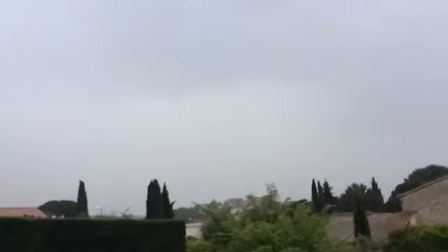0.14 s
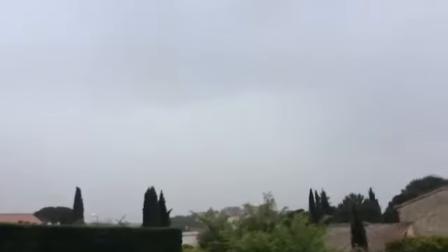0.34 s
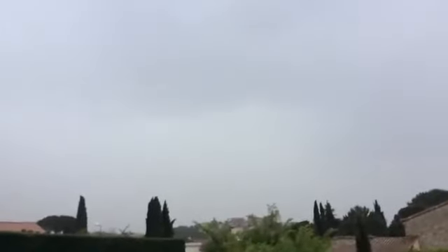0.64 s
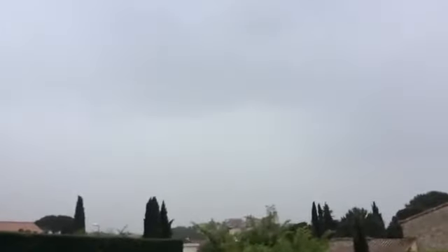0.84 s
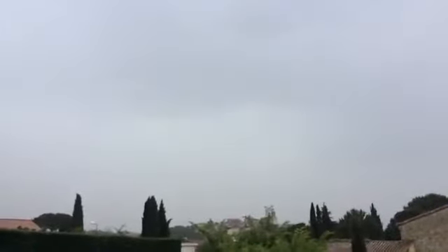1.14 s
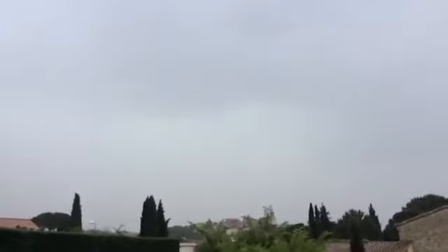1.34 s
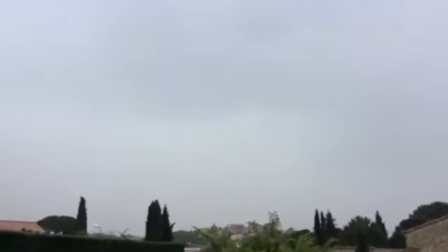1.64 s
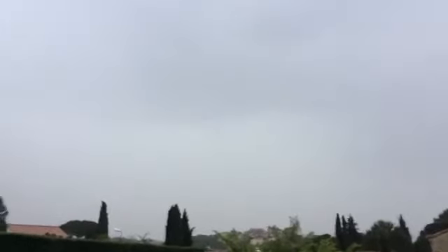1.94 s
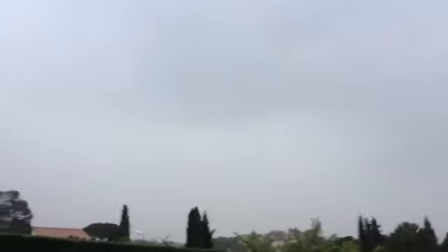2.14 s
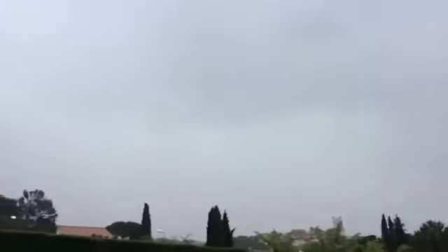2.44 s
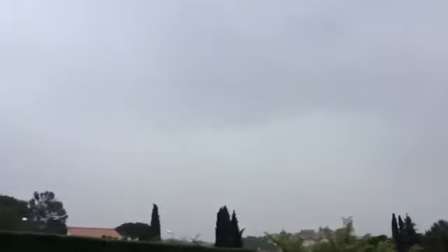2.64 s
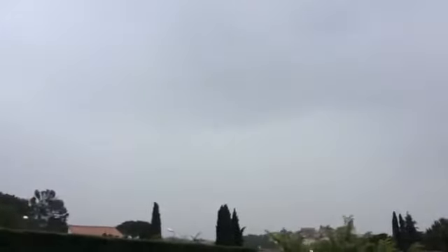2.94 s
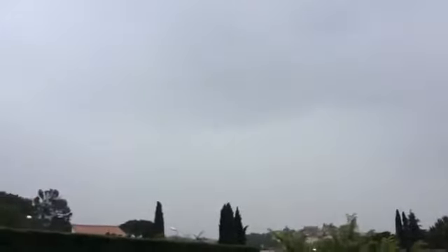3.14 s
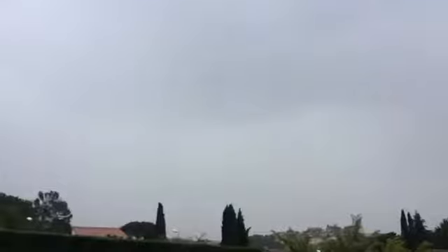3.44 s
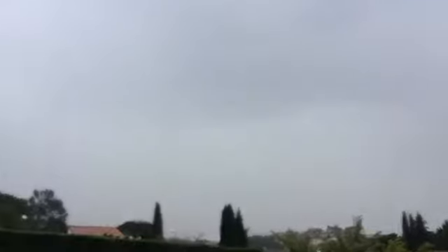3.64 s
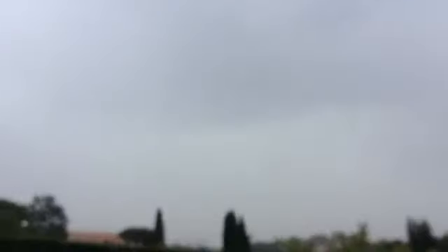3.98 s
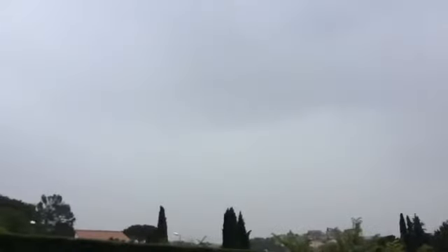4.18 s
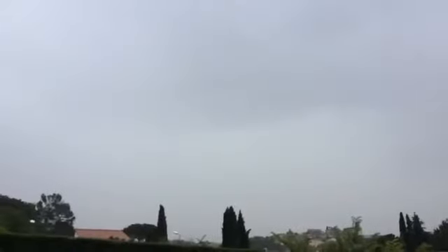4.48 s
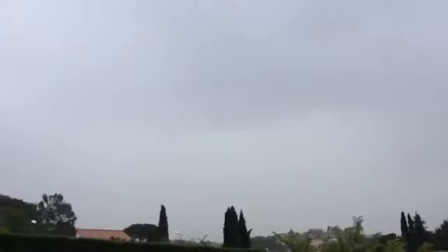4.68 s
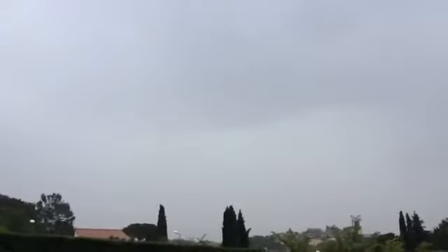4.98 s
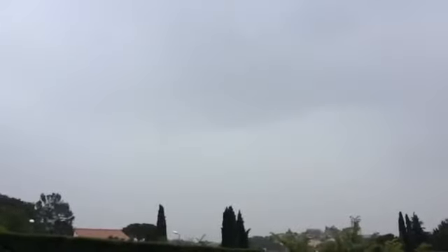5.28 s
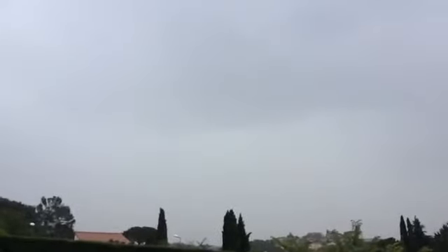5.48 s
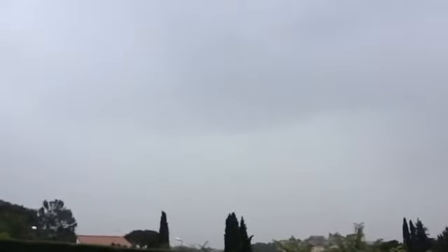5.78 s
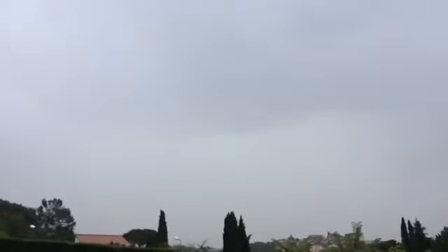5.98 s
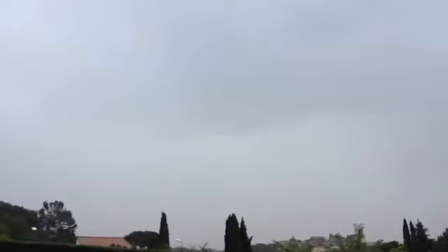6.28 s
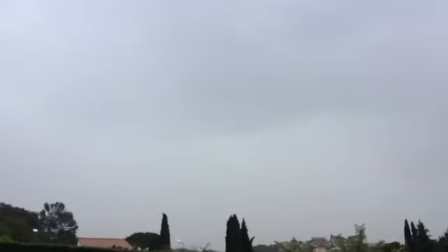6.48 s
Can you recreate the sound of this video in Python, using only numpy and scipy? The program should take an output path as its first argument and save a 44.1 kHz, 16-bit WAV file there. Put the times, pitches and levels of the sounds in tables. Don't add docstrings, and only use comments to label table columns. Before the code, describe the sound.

Distant low thunder rolls and bumps, then fades into weak rumbles beneath steady rain pattering and ticking on garden leaves and roof tiles.

```python
import sys
import numpy as np
from scipy import signal
from scipy.fft import rfft, irfft
from scipy.io import wavfile
from scipy.ndimage import uniform_filter1d

SR = 44100
rng = np.random.default_rng(int(sys.argv[2]) if len(sys.argv) > 2 else 0)


def put_to_file(sound):
    columns = np.atleast_2d(sound).T
    safe = np.clip(columns, -1, 1)
    whole_steps = np.round(safe * 32767)
    wavfile.write(sys.argv[1], SR, whole_steps.astype(np.int16))


def attenuation_scalar(level_db):
    decades = np.asarray(level_db, float) / 20
    return 10 ** decades


N = 291942

# time in seconds, strength in dB.
ROLL_STRENGTH = [(0.0, -50), (0.33, -51.5), (0.87, -44.5), (0.93, -49), (1.07, -53.5), (1.31, -47.5),
                 (1.68, -54), (2.53, -53.5), (2.96, -52), (3.06, -49), (3.15, -50), (3.24, -55),
                 (3.57, -59), (3.59, -47), (3.65, -56), (5.97, -56.5), (6.16, -51.5), (6.25, -57),
                 (6.62, -57.5)]
MIDDLE_DB = -53
# lowest pitch in Hz, highest pitch in Hz, cycles per wave, arrivals per second.
ROLL_PARTS = [
    (55, 118, 2.55, 180),
    (128.9, 179.8, 8.7, 250),
    (182, 244.4, 8.1, 350),
    (251.7, 483.5, 2.6, 800),
    (35.3, 58, 1.5, 67),
]
# level in dB at middle strength, share of the strength it follows.
ROLL_BEDS = [
    (-53.5, 0.28),
    (-51, .9),
    (-54, 1),
    (-52.5, 0.92),
    (-60, .1),
]
# time in seconds, peak in dB, length in seconds.
BOOMS = [(0.047, -39, 0.023), (0.167, -37, 0.023), (.33, -44, 0.09), (0.684, -38, 0.037),
         (.93, -44.5, 0.055), (1.09, -54, .03), (1.234, -52, .02), (1.48, -46, 0.049), (1.783, -49, 0.055),
         (2.1, -43, 0.092), (2.39, -44, 0.025), (2.67, -45, 0.046), (3.088, -39, 0.06), (3.3, -53, 0.11),
         (3.62, -44, 0.09), (3.797, -46, 0.035), (4.05, -45, 0.036), (4.363, -46, 0.033),
         (4.57, -57, 0.069), (4.995, -46, 0.058), (5.25, -57, 0.086), (5.5, -57, 0.087),
         (5.79, -47.5, 0.079), (5.962, -49, 0.078), (6.095, -42, 0.069), (6.196, -40, 0.037),
         (6.45, -46, 0.053)]
BOOM_HZ, BOOM_OCTAVES = 71, 0.33
# time in seconds, peak in dB, pitch in Hz, length in seconds.
SWELLS = [(.005, -33, 169, .03), (0.09, -37.5, 203, 0.029), (0.215, -43, 174, 0.086),
          (0.33, -47, 150, 0.052), (0.477, -46.5, 174, 0.1), (0.64, -39, 155, 0.028),
          (.76, -43.5, 201, .06), (0.838, -29.5, 168, 0.031), (1.123, -44.5, 150, 0.025),
          (1.233, -46, 150, 0.023), (1.328, -40, 183, 0.16), (1.478, -40, 173.5, 0.098),
          (1.735, -42.5, 176, 0.036), (1.85, -45.5, 148, 0.081), (2.07, -47, 198, .1),
          (2.295, -49.5, 152, .04), (2.41, -52, 150, 0.019), (2.524, -50, 151, 0.045),
          (2.72, -50, 195, 0.033), (2.927, -54, 180, 0.052), (3.045, -38, 162, 0.035),
          (3.18, -54, 187, 0.066), (3.61, -50, 183, 0.044), (3.797, -49.5, 169, 0.035),
          (4.04, -53, 170, .03), (4.27, -59, 193, 0.042), (5.894, -44.5, 151, 0.023),
          (6.158, -45.5, 175, .06), (6.288, -44.5, 178, 0.022), (6.442, -47.5, 150, .03)]
SWELL_OCTAVES = 0.22
# start in seconds, peak in dB, pitch in Hz.
CLAPS = [(0.008, -29.5, 157), (0.015, -35.5, 217), (0.041, -32, 105), (0.042, -33.3, 145),
         (0.082, -35, 200), (0.099, -28, 217), (0.118, -31, 171), (0.151, -28.5, 105), (0.362, -33, 154),
         (0.414, -31.5, 145), (0.598, -33.7, 144), (0.643, -31.6, 170), (0.806, -28, 134),
         (0.807, -33.5, 185), (0.854, -31.5, 300), (0.871, -37, 157), (0.876, -33.0, 277),
         (1.222, -33.0, 158), (1.278, -32.3, 185), (1.281, -34, 255), (1.312, -35, 217),
         (1.332, -32.3, 157), (1.332, -33, 217), (1.364, -31.6, 185), (1.374, -34, 134),
         (1.405, -32.0, 217), (1.435, -33, 233), (1.453, -32, 105), (1.453, -30, 145), (1.456, -36, 200),
         (1.496, -41, 235), (1.496, -27.5, 170), (1.547, -33, 185), (1.748, -32.5, 168),
         (2.112, -32.5, 134), (2.717, -33, 217), (2.897, -34, 200), (2.992, -35.8, 157),
         (3.019, -32.5, 145), (3.039, -39, 200), (3.045, -36, 277), (3.052, -34, 145), (3.059, -36.5, 255),
         (3.066, -40, 105), (3.098, -33.5, 134), (3.137, -36.6, 104), (3.231, -33, 200),
         (4.033, -37.5, 135), (6.099, -35, 123), (6.146, -38, 134), (6.16, -37, 185), (6.193, -31.5, 105),
         (6.195, -41, 145)]
# start in seconds, peak in dB,
# pitch in Hz.
MORE_CLAPS = [(.154, -38, 71), (.283, -35, 80), (.642, -36, 71), (.651, -32.5, 100), (.695, -33.5, 100),
              (0.695, -38, 71), (.888, -36, 100), (.932, -34.5, 100), (1.233, -40, 100), (1.5, -37, 71),
              (1.727, -37, 100), (2.039, -35, 84), (2.086, -35, 75), (2.352, -37.5, 67), (2.384, -38, 95),
              (2.607, -42, 95), (2.644, -36, 100), (2.717, -40, 89), (3.015, -40, 64), (3.074, -38, 71),
              (3.097, -37, 100), (3.587, -38, 84), (3.631, -42, 80), (4.028, -37, 100), (4.317, -39, 60),
              (4.953, -37, 75), (6.037, -36, 71), (6.085, -37.5, 75), (6.18, -33, 67), (6.444, -38, 100),
              (.235, -35, 150), (.826, -33, 140), (.852, -30.5, 149), (3.594, -36.5, 200), (3.608, -39, 330),
              (3.2, -43, 330), (1.87, -38, 120), (1.97, -39, 120), (2.265, -39, 75), (2.56, -35, 160),
              (3.22, -40, 80), (3.52, -40, 115), (3.7, -41, 75), (4.15, -42, 165), (4.58, -40, 120),
              (4.65, -42, 150), (5.215, -42, 75), (5.785, -39, 110), (5.845, -39, 80), (5.89, -39, 110),
              (6.25, -42, 100)]
# start in seconds, peak in dB, pitch in Hz.
FRONTS = [
    (.7745, -24.5, 165),
    (.8392, -22, 170),
]
CLAP_DAMPING, FRONT_DAMPING = 0.2, 0.29
CLAP_DB, COVER_DB = -2.5, -10.5

# start in seconds, tick in dB, ring in Hz, splash in dB.
TILE_DROPS = [(.0547, -27.5, 3400, -56), (.0712, -31, 2380, -46), (.1101, -28, 3300, -51),
              (.3275, -30, 2900, -46), (.4299, -34, 3580, -56), (.566, -40, 2500, -53),
              (.9028, -36, 2310, -49), (.9774, -26.5, 3970, -52), (1.1004, -35, 4610, -51),
              (1.136, -26, 2370, -48), (1.266, -29.5, 3640, -55), (1.4374, -32, 4060, -55),
              (1.8632, -28, 2880, -45.5), (1.8801, -31, 1900, -48), (1.892, -28, 2200, -52),
              (2.286, -32, 3360, -51), (2.3534, -37, 2400, -54), (2.6024, -34, 4250, -50),
              (3.2375, -30, 2020, -48), (4.91, -42, 4000, -49), (5.1225, -29, 2770, -57),
              (5.1268, -28, 2500, -49), (5.157, -35, 3900, -47), (5.168, -36, 3000, -50),
              (5.3857, -36, 2910, -52), (5.8316, -34, 2540, -51), (6.479, -36, 2740, -49)]
# start in seconds, tick in dB, ring in Hz, splash in dB.
LEAF_SNAPS = [(.3064, -40, 5660, -48), (.6564, -29, 6080, -44), (.6624, -30, 6380, -51),
              (.706, -37, 5600, -43), (1.1375, -30, 5100, -54), (1.639, -37, 6500, -46),
              (1.7968, -35, 4860, -50), (1.8632, -32, 5570, -53), (2.0457, -33, 5590, -55),
              (2.0632, -38, 6310, -48), (2.2857, -42, 5170, -45), (3.2375, -33, 5990, -49),
              (3.5882, -33, 5130, -46), (3.984, -35, 5680, -46), (4.9254, -37, 6180, -50),
              (5.1225, -39, 6000, -56), (5.127, -34, 6200, -55), (6.0417, -38, 6870, -52),
              (6.1754, -36, 4910, -53), (6.2976, -38, 5320, -45), (6.3664, -36, 6000, -47)]
# start in seconds, tick in dB, ring in Hz, splash in dB.
PUDDLE_RINGS = [(1.5866, -33, 3660, -55), (1.6052, -33, 2900, -49), (1.607, -34, 4130, -52),
                (3.258, -32, 2930, -54), (3.29, -39, 2640, -45), (6.001, -42, 3500, -58),
                (6.006, -40, 2900, -50), (6.055, -40, 3100, -50), (6.0195, -35, 2950, -49),
                (6.0425, -32.5, 2900, -48), (6.043, -40, 4600, -56), (6.0625, -31, 2580, -46),
                (6.066, -40, 3800, -52), (6.0745, -40, 3360, -52), (5.131, -36, 2790, -51),
                (5.164, -37, 4000, -53), (6.083, -34, 2400, -48)]
# start in seconds, tick in dB, ring in Hz, splash in dB.
SILL_CRACKS = [(.2507, -29, 2200, -54), (.252, -30, 1700, -54), (.259, -29, 2100, -48),
               (.266, -33, 1890, -47), (.6850, -26, 7000, -41), (.6852, -24.5, 5300, -46.5),
               (.6855, -30.5, 3220, -54), (1.1365, -31, 6880, -59), (1.6374, -23.5, 2640, -47),
               (1.6388, -29.5, 3000, -50), (1.639, -31, 4400, -52), (1.6380, -28, 3500, -44),
               (1.65, -30, 2800, -45), (1.8, -36, 2370, -52), (3.3, -40, 1300, -52),
               (3.824, -34, 2260, -58), (4.438, -40, 1450, -54), (4.418, -37, 2600, -50),
               (4.66, -38, 3600, -50), (4.25, -39, 2000, -49)]
# start in seconds, tick in dB, ring in Hz, splash in dB.
EAVES_DRIPS = [(.065, -32, 2330, -48), (.091, -39, 1640, -49), (.2505, -33, 1460, -51),
               (.263, -30, 1300, -41), (.308, -35, 1300, -44.5), (.408, -41, 999, -50.5),
               (.566, -40, 1360, -49), (.628, -39, 800, -48), (.649, -35, 1810, -52), (.75, -42, 703, -44),
               (.767, -29, 2090, -44), (1.155, -30, 1300, -46), (1.333, -45, 950, -45.5),
               (1.476, -30, 1350, -49), (1.796, -37, 1390, -45), (1.88, -30, 1810, -44.5),
               (2.112, -36, 1900, -44), (2.353, -43, 1430, -43.5), (2.618, -33, 977, -41.5),
               (2.633, -36, 2030, -47), (2.648, -37, 1320, -49), (2.871, -35, 1120, -44),
               (3.207, -48, 1040, -46), (3.593, -37, 1790, -43), (3.967, -29.5, 1420, -51),
               (4.417, -43, 848, -44), (4.542, -34, 1160, -48), (4.927, -41, 1400, -43.5),
               (4.972, -28, 1130, -48), (5.871, -42, 1370, -49), (.385, -40, 750, -50),
               (.53, -36, 1400, -47), (.622, -37, 2700, -52), (1.195, -42, 750, -48),
               (1.362, -38, 750, -49), (1.66, -36, 1500, -51), (2.622, -35, 2600, -54),
               (2.653, -36, 2200, -55), (2.755, -38, 1800, -50), (2.908, -39, 1400, -50),
               (3.38, -35, 750, -58), (4.596, -38, 1100, -48), (5.727, -41, 2800, -47.5),
               (6.226, -34, 750, -50)]

# time in seconds, level in dB, brightness in dB of treble over the middle.
SHOWER = [
    (0.0, -48, 0.7),
    (0.66, -47.5, 0.6),
    (3.359, -48, 0.4),
    (4.35, -48.5, 1.05),
    (4.851, -49, 1),
    (6.62, -47.5, 0.83),
]
# pitch in Hz, level in dB per Hz.
WASH_COLOUR = [(24, -29), (40, -3), (70, 3.5), (155, 6.5), (314, -11.5), (419, -16), (523, -11.5),
               (1620, -14), (4400, -19.5), (6000, -20), (7320, -22), (8000, -22.5), (10400, -62),
               (17600, -120)]

# time in seconds, length in seconds.
TREBLE_DIPS = [
    (.03, .02),
    (.11, .02),
    (.41, .08),
    (.665, .03),
    (.855, .02),
    (1.5, .025),
]
# time in seconds, lowest pitch in Hz, highest pitch in Hz, level in dB.
SIDE_HISS = [(.125, 5160, 6300, -61), (.385, 5100, 6960, -61), (.5, 6200, 7600, -64),
             (.68, 3240, 7800, -62.5), (2.17, 4150, 5200, -63), (2.73, 5600, 7000, -63),
             (2.94, 4170, 5170, -68), (3.17, 4150, 5750, -62), (4.075, 4150, 5200, -64),
             (4.24, 5150, 6220, -62), (5.33, 5650, 6800, -63), (5.955, 5140, 6300, -63)]


def evened(x):
    return x / np.sqrt(np.mean(x ** 2) + 1e-20)


def read(points, hz):
    f, value = np.transpose(points)
    return np.interp(np.log(hz + 1), np.log(f + 1), value)


def add(mix, s, sound):
    part = mix[max(round(s * SR), 0):][:len(sound)]
    part += sound[:len(part)]


def band(x, lo_hz, hi_hz, order=2):
    sos = signal.butter(order, [lo_hz, min(hi_hz, SR / 2.2)], "band", fs=SR, output="sos")
    return signal.sosfilt(sos, x)


def damped_wave(t, hz, decay_per_s, peak_db):
    u = decay_per_s * t
    return attenuation_scalar(peak_db) * np.e * u * np.exp(-u) * np.sin(2 * np.pi * hz * t)


def grains(lo_hz, hi_hz, cycles, per_s, spread_db, count=16):
    arrives = rng.random(N) < per_s / SR
    size = attenuation_scalar(spread_db * np.minimum(rng.exponential(1, N), 3.2)) * arrives
    size *= rng.choice([-1., 1.], N)
    kind, out = rng.integers(0, count, N), np.zeros(N)
    for k, hz in enumerate(np.geomspace(lo_hz, hi_hz, count)):
        u = np.arange(0, 4 * cycles, hz / SR) / cycles
        wavelet = u * np.exp(-3 * u) * np.sin(2 * np.pi * cycles * u) * np.sqrt(hz)
        out += signal.oaconvolve(size * (kind == k), wavelet)[:N]
    return evened(out)


def roll_loudness(t, hz, bed_db, share):
    strength_db = np.interp(t, *np.transpose(ROLL_STRENGTH))
    power = attenuation_scalar(bed_db + share * (strength_db - MIDDLE_DB)) ** 2
    rises = [(*row, SWELL_OCTAVES) for row in SWELLS]
    rises += [(s, db, BOOM_HZ, length, BOOM_OCTAVES) for s, db, length in BOOMS]
    for s, peak_db, centre_hz, length, reach in rises:
        off_pitch = np.log2(hz / centre_hz) / reach
        power = power + attenuation_scalar(peak_db) ** 2 * np.exp(-((t - s) / length) ** 2 - off_pitch ** 2)
    return np.sqrt(power)


def thunder():
    t, out = np.arange(N) / SR, np.zeros(N)
    slow = t[::64]
    for part, bed in zip(ROLL_PARTS, ROLL_BEDS):
        waves = grains(*part, spread_db=2.0)
        swell = uniform_filter1d(uniform_filter1d(waves ** 2, 2600), 2600)
        steadied = evened(waves / (abs(swell) + 0.045) ** 0.37)
        middle_hz = np.sqrt(part[0] * part[1])
        cover = np.zeros(len(slow))
        for s, _, hz in CLAPS + MORE_CLAPS + FRONTS:
            off_pitch = np.log2(hz / middle_hz) / .45
            cover += np.exp(-((slow - s) * hz - 1.2) ** 2 / 2.4 - off_pitch ** 2)
        level = roll_loudness(slow, middle_hz, *bed) * attenuation_scalar(COVER_DB * np.minimum(cover, 1))
        out += np.interp(t, slow, level) * steadied
    single = [(*row, CLAP_DAMPING) for row in CLAPS + MORE_CLAPS]
    single += [(*row, FRONT_DAMPING) for row in FRONTS]
    for s, peak_db, hz, damping in single:
        add(out, s, damped_wave(t[:6000], hz, damping * 2 * np.pi * hz, peak_db + CLAP_DB))
    return out


def hits(rows, width_hz, t60, echo_s, echo_share, spread):
    t, out = np.arange(6000) / SR, np.zeros(N)
    sprays = rng.standard_normal((len(rows), len(t)))
    spray_fade = attenuation_scalar(-60 * t / t60) * np.minimum(t / .0015, 1)
    for (s, tick_db, hz, splash_db), spray in zip(rows, sprays):
        tick = damped_wave(t, hz, 2 * np.pi * width_hz, tick_db - 4.0)
        low_hz = max(hz - spread * width_hz, hz * 0.33)
        high_hz = hz + spread * width_hz
        splash = attenuation_scalar(splash_db) * evened(band(spray, low_hz, high_hz)) * spray_fade
        add(out, s + .0006, tick + splash)
        add(out, s + echo_s, echo_share * tick)
    return out


def near_drops():
    tile = hits(TILE_DROPS, width_hz=1070, t60=0.11, echo_s=0.013, echo_share=0.19, spread=1.9)
    leaf = hits(LEAF_SNAPS, width_hz=670, t60=.05, echo_s=0.01, echo_share=.35, spread=2.8)
    puddle = hits(PUDDLE_RINGS, width_hz=390, t60=0.054, echo_s=0.0052, echo_share=.35, spread=1.3)
    sill = hits(SILL_CRACKS, width_hz=810, t60=0.061, echo_s=0.002, echo_share=0.18, spread=2.3)
    gutter = hits(EAVES_DRIPS, width_hz=740, t60=0.12, echo_s=.0035, echo_share=0.25, spread=1.4)
    return tile + leaf + puddle + sill + gutter


def rain():
    s, level_db, bright_db = np.transpose(SHOWER)
    frames, hz = N // 128 + 5, np.fft.rfftfreq(512, 1 / SR)[:, None]
    a, b, patches = rng.standard_normal((frames, 257, 3)).T
    patches = evened(uniform_filter1d(uniform_filter1d(patches, 14, axis=0), 16, axis=1))
    flicker = evened(uniform_filter1d(rng.standard_normal(frames), 5))
    t = np.arange(frames) * 128 / SR
    tilt_db = np.log2(hz / 2500 + 0.17) * np.interp(t, s, bright_db)
    rumble_cut_db = -12. / (1 + (hz / 350) ** 4)
    field_db = read(WASH_COLOUR, hz) + rumble_cut_db + tilt_db + 1.13 * patches + 0.44 * flicker
    wash = signal.istft((a + 1j * b) * attenuation_scalar(field_db), nperseg=512, noverlap=384)[1][:N]
    patter = grains(933, 7530, 2.0, 900, spread_db=3.0, count=24)
    mixed = evened(wash) + attenuation_scalar(-11.0) * patter
    mixed /= np.std(band(mixed, 530, 7500, order=4))
    return mixed * attenuation_scalar(np.interp(np.arange(N) / SR, s, level_db) - 0.29)


def scene():
    heard = thunder() + near_drops() + rain()
    return np.array([heard, heard])


def side_hiss():
    side, fade = np.zeros(N), np.sin(np.pi * np.arange(2048) / 2048)
    noises = rfft(rng.standard_normal((len(SIDE_HISS), 2048)))
    hz = np.fft.rfftfreq(2048, 1 / SR)
    for (s, lo_hz, hi_hz, level_db), noise in zip(SIDE_HISS, noises):
        puff = evened(irfft(noise * (hz > lo_hz) * (hz < hi_hz)))
        add(side, s - 1024 / SR, attenuation_scalar(level_db) * puff * fade)
    return np.array([side, -side])


def treble_edge(x):
    hz, t, z = signal.stft(x, SR, nperseg=2048, noverlap=1536)
    hz = hz[:, None]
    wander = evened(uniform_filter1d(rng.standard_normal(len(t)), 8))
    lost = sum(abs(t - s) < length / 2 + .01 for s, length in TREBLE_DIPS)
    edge_hz = np.minimum(8030 + 55 * wander, 8110) - 350 * lost
    slope_db = -17. * np.clip((hz - 7350) / 800, 0, 2) ** 2
    return signal.istft(z * attenuation_scalar(slope_db) * (hz < edge_hz), SR, nperseg=2048, noverlap=1536)[1][:, :N]


def top_cut(x):
    return signal.sosfilt(signal.butter(12, 8200, fs=SR, output="sos"), x)


def record(dry):
    capsule = signal.sosfilt(signal.butter(3, 37, "high", fs=SR, output="sos"), dry)
    heard = treble_edge(capsule + side_hiss())
    return top_cut(heard)


dry = scene()
out = record(dry)
put_to_file(out)
```